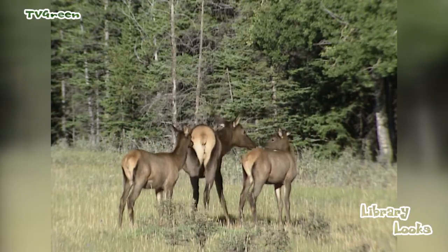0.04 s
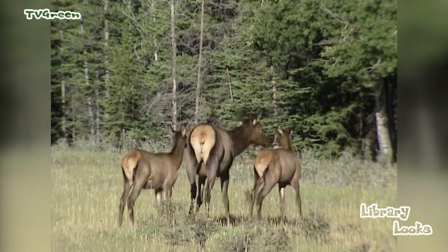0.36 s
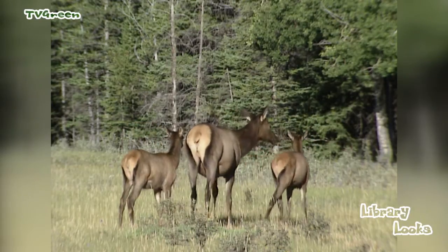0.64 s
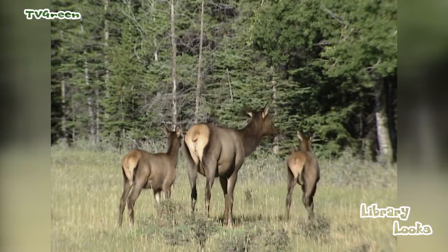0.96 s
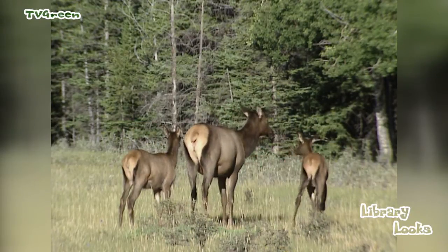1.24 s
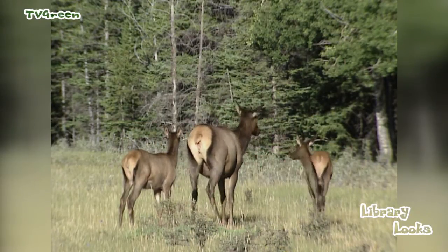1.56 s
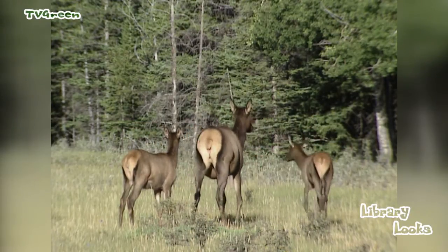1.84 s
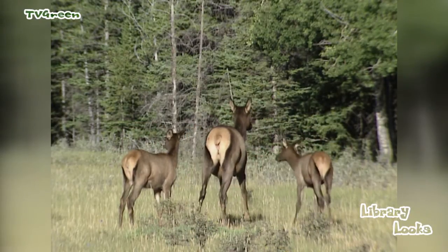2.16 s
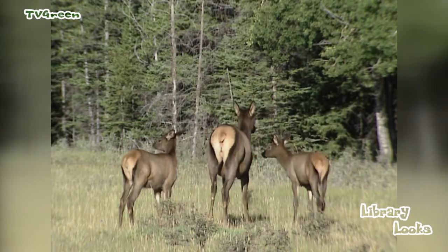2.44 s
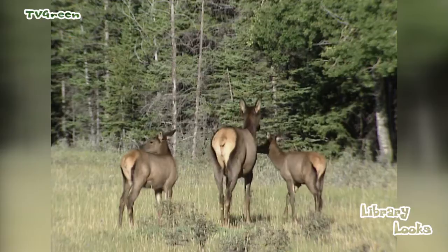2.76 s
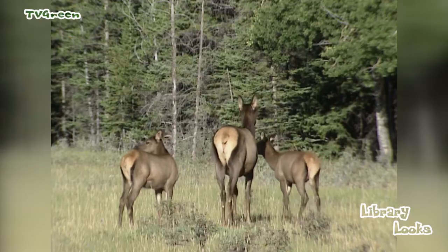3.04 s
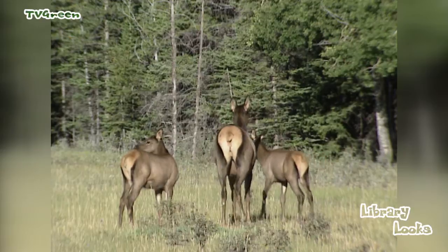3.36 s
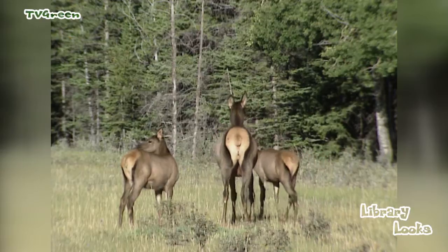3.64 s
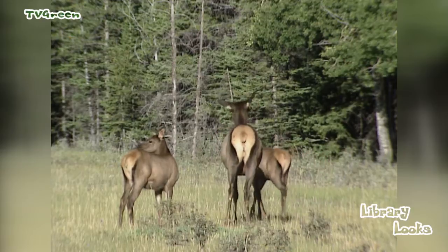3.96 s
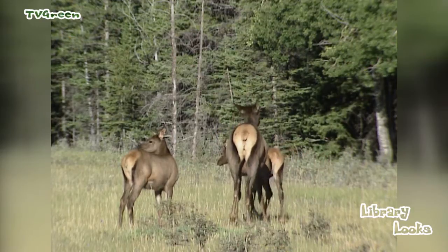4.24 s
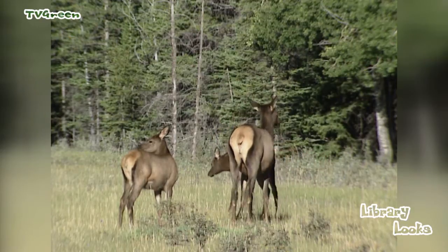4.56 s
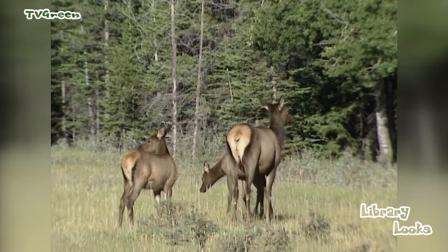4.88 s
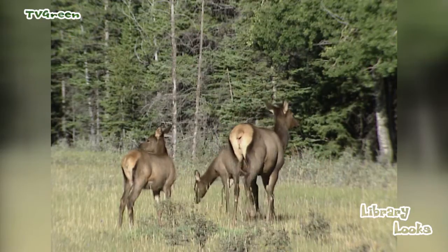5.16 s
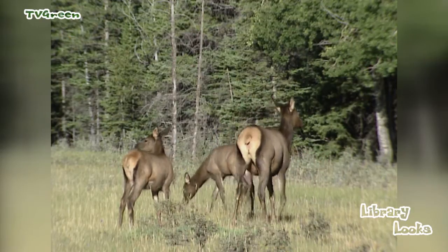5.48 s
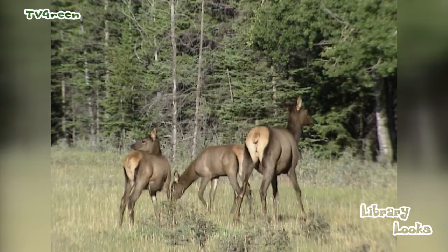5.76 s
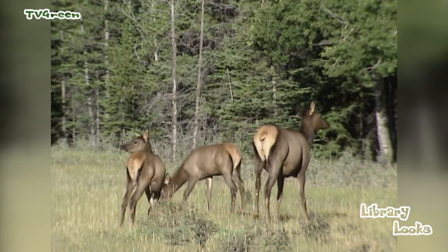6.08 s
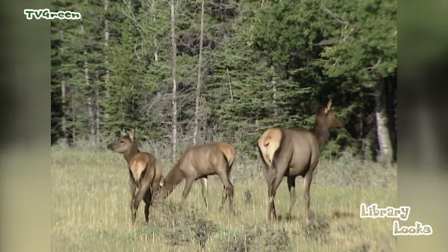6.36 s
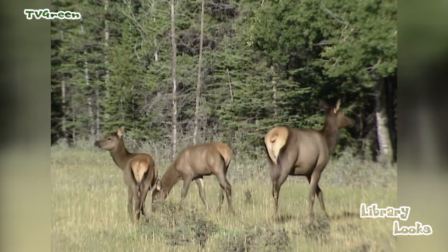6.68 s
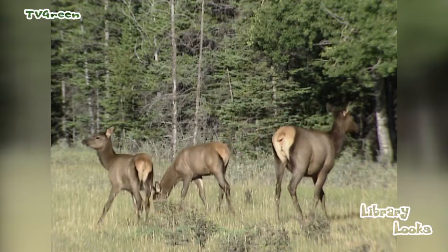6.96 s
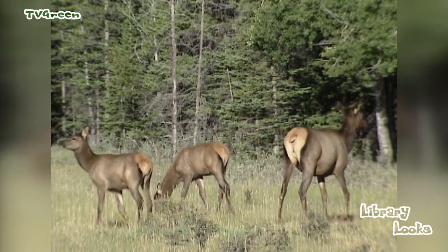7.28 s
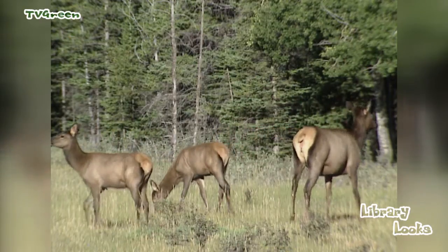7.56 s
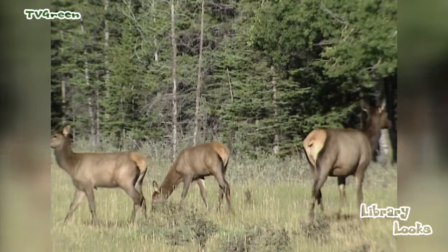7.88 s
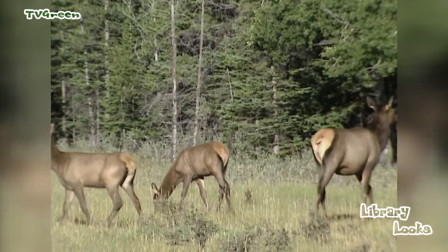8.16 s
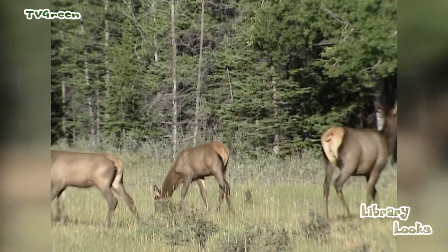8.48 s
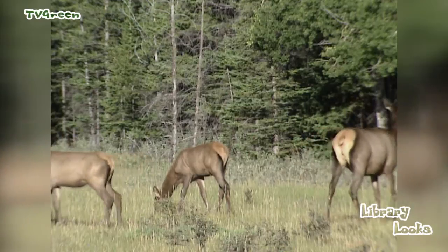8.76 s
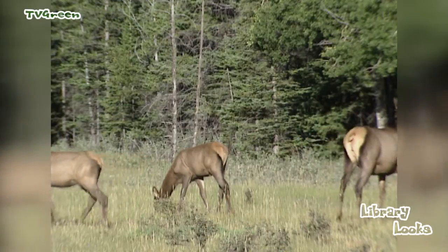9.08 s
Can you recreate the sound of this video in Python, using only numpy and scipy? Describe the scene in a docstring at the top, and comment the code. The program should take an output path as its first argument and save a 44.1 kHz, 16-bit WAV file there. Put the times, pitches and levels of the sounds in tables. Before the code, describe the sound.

A quiet forest clearing opens with the soft murmur of a distant road, faint far-off bird peeps and a few tiny snaps of dry stems. A very thin, high electronic whine sits barely audible throughout. At about 1.7 seconds a small bird gives a short, sharp, rising chirp that echoes briefly among the trees. From about 2 seconds a breeze buffets the microphone with a low, uneven rumble, the loudest sound, peaking near 3.4 seconds. The bird calls again at 3.3 and 4.5 seconds. From about 5 seconds elk brush very softly through the grass, with a few dry ticks. The wind eases after 6 seconds, and the fourth chirp comes at 7.8 seconds. The wind dies away by 8.5 seconds, leaving light grass swishes, ticks and distant peeps over the road murmur until the end, just after 9 seconds.

```python
"""A forest clearing where elk graze. From the start a distant road murmurs, the camera whines thinly,
stems snap and far birds peep. Near 1.7 s a small bird sings the first of four sharp "whit" calls, two
voices at once, which echo among the trunks. A breeze rises and buffets the microphone through the next
two calls (3.3 and 4.5 s). From about 5 s the elk swish through the grass. The breeze eases after 6 s,
the last whit comes at 7.8 s, and the wind dies away under more swishes and dry ticks."""
import sys
import numpy as np
from scipy import signal
from scipy.fft import rfft, irfft
from scipy.io import wavfile
from scipy.ndimage import uniform_filter1d

SR = 44100
rng = np.random.default_rng(int(sys.argv[2]) if len(sys.argv) > 2 else 0)


def unload_audio(sound):
    """Save the sound as a 16-bit wav file, at the path given as the first command line argument."""
    columns = np.transpose(np.atleast_2d(sound))
    # keep every value between -1 and 1, then stretch to whole-number steps
    steps = np.round(np.clip(columns, -1, 1) * 32767)
    wavfile.write(sys.argv[1], SR, steps.astype(np.int16))


N = 406602
TIME = np.arange(N) / SR


def gain(db):
    """Turn decibels into a number to multiply by."""
    return 10 ** (np.asarray(db) / 20)


def unit(x):
    """Scale a signal so its average size (rms) is 1."""
    return x / np.sqrt(np.mean(x ** 2))


def curves(table, at=TIME):
    """Join a table's rows with straight lines: one curve for each column after the first."""
    times, *columns = np.transpose(table)
    return [np.interp(at, times, column) for column in columns]


def add(out, start_s, x):
    """Mix x into out at the given time."""
    i = max(int(start_s * SR), 0)
    out[i:i + len(x)] += x[:max(N - i, 0)]


def noise(spectrum):
    """Noise of size 1, its tone shaped by rows of f/Hz, level/dB."""
    hz, db = np.transpose(spectrum)
    freqs = np.maximum(np.fft.rfftfreq(N, 1 / SR), 1)
    shape = gain(np.interp(np.log(freqs), np.log(hz), db))
    return unit(irfft(rfft(rng.standard_normal(N)) * shape, N))


def band(x, hz, width_hz):
    """Keep the sound near one pitch; filtering twice makes the edges steeper."""
    b, a = signal.iirpeak(min(hz, .45 * SR), hz / width_hz, fs=SR)
    return signal.lfilter(b, a, signal.lfilter(b, a, x))


def wander(per_s):
    """A smooth random curve of size 1 that changes about per_s times a second."""
    return noise([(per_s / 2, 0), (per_s, -3), (2 * per_s, -30), (4 * per_s, -120)])


def jitter(count, smooth):
    """A quick random tremble of size 1, averaged over `smooth` samples."""
    return unit(uniform_filter1d(rng.standard_normal(count), size=smooth))


def steady(x, span_s):
    """Even out the slow swells of a noise."""
    return x / np.sqrt(uniform_filter1d(x ** 2, int(span_s * SR)) + 1e-9)


def forest(x, echo_db, wood_fade_s=.8, ring_fade_s=1.1, trunks_fade_s=.3):
    """Near trunks throw back clear echoes; the deeper wood adds a grainy tail that fades to a ring."""
    t = np.arange(SR) / SR

    def echoes(per_s, fade_s):
        """Randomly timed echoes that drop by 60 dB in fade_s."""
        taps = rng.standard_normal(SR) * (rng.random(SR) < per_s / SR)
        return unit(taps * gain(-60 * t / fade_s) * (t > .003)) / np.sqrt(SR)

    treble = signal.butter(2, [2900, 6500], "band", fs=SR, output="sos")
    wood = signal.sosfilt(treble, echoes(1300, wood_fade_s))
    ring = band(echoes(400, ring_fade_s), hz=3630, width_hz=680)
    trunks = echoes(300, trunks_fade_s)
    response = gain(echo_db) * (wood + gain(-1) * ring) + gain(-11) * trunks
    return x + signal.fftconvolve(x, response)[:N]


# The whine of the camera's electronics: f/Hz, level/dB
CAMERA_WHINE = [(15622, -81)]
def camera():
    """The electronics whine and the motor adds two faint notes, all slightly unsteady."""
    motor_notes = [(1163, -83.5), (6037, -99)]  # f/Hz, level/dB
    out = np.zeros(N)
    for hz, db in list(CAMERA_WHINE) + motor_notes:
        phase = 2 * np.pi * np.cumsum(hz + 4 * wander(17.4)) / SR
        out += np.sqrt(2) * gain(db) * np.sin(phase)
    return out


# The tone of the far road and treetops: f/Hz, relative level/dB
RUSH_TONE = [(25, -8.5), (100, 5.5), (150, 4.5), (200, -0.5), (300, -0.5), (500, 0), (900, -0.5),
             (1200, -4), (1600, -12), (2300, -17.5), (3100, -21), (4200, -26.5), (7000, -29), (10000, -32),
             (15500, -33)]
# Far motors: t/s, low drone level/dB, higher hum level/dB
FAR_MOTORS = [(0, -60, -85), (1.2, -60.5, -69.5), (2.5, -56.5, -68), (3.4, -70, -72.5), (6.5, -75, -81),
              (9.2, -65, -113)]
def road_and_treetops(rush_db=-59, swell_db=.2):
    """An even rush from the road and the treetops, with motors droning in it."""
    drone_db, hum_db = curves(FAR_MOTORS)
    out = noise(RUSH_TONE) * gain(rush_db + swell_db * wander(4))
    for hz, db in (97, drone_db), (410, hum_db):
        phase = 2 * np.pi * np.cumsum(hz + 3 * wander(8)) / SR
        out += gain(db) * np.sin(phase)
    return out


# The breeze at the microphone rises, blows for four seconds and dies away: t/s, level/dB
BREEZE_LEVEL = [(0, -66.5), (1.35, -62), (1.6, -50.5), (2.1, -52), (2.35, -43.5), (2.75, -39.5), (3.4, -36),
                (4.1, -40.5), (4.5, -43), (5.4, -43), (5.6, -49.5), (5.8, -43), (6.2, -44), (6.45, -52),
                (8.1, -53.5), (8.55, -66), (9.22, -62)]
# Sudden gusts: peak t/s, length/s, level above the breeze/dB
SUDDEN_GUSTS = [(2.222, 0.12, 10.5), (2.987, 0.053, 4), (3.352, 0.044, 4), (4.252, .11, 6),
                (4.954, 0.14, 2.5), (5.768, 0.23, 6)]
# The deep tone of big swirls of air: f/Hz, relative level/dB
BIG_SWIRLS = [(10, -39), (25, -7), (38, 9.5), (58, 0), (85, -5.5), (120, -21), (200, -47.5), (900, -110)]
# The higher tone of small swirls: f/Hz, relative level/dB
SMALL_SWIRLS = [(30, -38), (65, -2), (110, 0.5), (160, -6), (220, -12.5), (320, -20.5), (600, -40),
                (3000, -100)]
def wind(flutter_db=2, fresh_breeze_db=-40, small_in_fresh_db=-50.5, small_growth=1.48):
    """Big swirls of air thump the microphone, gusts shed small ones, and rough air shakes both."""
    breeze_db, = curves(BREEZE_LEVEL)
    breeze_db += sum(db * np.exp(-(2 * (TIME - peak) / length) ** 2) for peak, length, db in SUDDEN_GUSTS)
    shake_db = flutter_db * wander(6)
    thumps = steady(noise(BIG_SWIRLS), span_s=.09) * gain(breeze_db + shake_db)
    # as the breeze picks up, the small swirls grow faster than the big ones
    small_db = small_in_fresh_db + small_growth * (breeze_db - fresh_breeze_db)
    return thumps + steady(noise(SMALL_SWIRLS), span_s=.12) * gain(small_db + shake_db)


# Short dry ticks, from snapping stems and a few clipped bird chips: t/s, middle f/Hz, width/Hz, level/dB
DRY_TICKS = [(.362, 4800, 3500, -69), (.665, 4500, 2500, -67), (.79, 9200, 1200, -73),
             (.818, 9400, 2000, -68), (0.915, 3100, 500, -56), (.916, 6400, 1200, -64),
             (1.068, 5140, 2000, -66), (2.964, 5100, 1500, -66), (3.13, 9300, 3000, -72),
             (3.22, 5100, 1500, -66), (4.765, 5000, 2500, -67), (5.19, 8000, 5000, -71),
             (5.225, 7000, 2000, -69), (5.257, 5060, 1200, -64), (5.32, 9500, 3500, -60.5),
             (8.64, 5500, 3000, -62), (9.115, 13500, 1000, -65)]
# Legs and muzzles brushing through grass: t/s, length/s, middle f/Hz, level/dB
GRASS_SWISHES = [(5.25, 0.17, 6300, -78.5), (5.394, 0.24, 8000, -81), (5.804, .21, 7860, -79.5),
                 (6.262, 0.29, 7700, -80.5), (6.61, .08, 8000, -82), (6.882, 0.15, 7200, -82),
                 (7.398, .16, 7000, -82), (7.945, .18, 7500, -81.5), (8.17, .22, 8000, -82.5),
                 (8.475, 0.3, 5860, -74), (8.658, 0.32, 6860, -78.5), (8.911, 0.39, 7400, -82.5)]
def ticks_and_swishes(tick_s=.0026, grain_db=7):
    """A tick is a brief burst of noise; a swish is a crowd of tiny clicks as blade rubs on blade."""
    out = np.zeros(N)
    t = np.arange(SR // 20) / SR
    for start, hz, width, db in DRY_TICKS:
        tick = band(rng.standard_normal(len(t)) * np.exp(-t / tick_s), hz, width)
        tick *= np.sqrt(tick_s * SR / 2 / np.sum(tick ** 2))  # same energy whatever the width
        add(out, start, gain(db) * tick)
    for start, length, hz, db in GRASS_SWISHES:
        count = int(length * SR)
        clicks = rng.standard_normal(count) * gain(grain_db * np.minimum(rng.exponential(size=count), 4))
        swell = np.sin(np.linspace(0, np.pi, count))
        add(out, start, gain(db) * unit(band(clicks, hz, .87 * hz)) * swell)
    return out


def voice_phase(hz, waver):
    """The phase (place in the wave) of one voice from a bird's voice box, its pitch a little shaky."""
    return 2 * np.pi * np.cumsum(hz * (1 + waver * jitter(len(hz), smooth=40))) / SR


# Thin, slightly arched "seet" notes of a second bird: t/s, top f/Hz, level/dB
SEET_NOTES = [(.963, 5720, -77), (1.292, 6020, -71), (3.16, 6350, -78), (4.33, 6000, -77),
              (5.683, 5870, -76), (6.898, 6300, -73.5), (7.158, 6300, -77), (7.69, 5930, -70),
              (8.885, 6130, -77)]
# Soft, lower chips from deeper in the wood: t/s, top f/Hz, level/dB
CHIP_NOTES = [(.135, 2800, -76), (1.011, 2870, -72), (4.365, 3200, -67.5), (6.338, 2695, -72),
              (7.21, 3100, -73), (7.732, 2900, -68.5), (8.927, 3330, -64)]
def peeps(notes, length_s, arch, rasp_db=3, octave_db=-9.5):
    """Each peep is a slightly hoarse whistle whose pitch arches and peaks late; distance dulls it."""
    out = np.zeros(N)
    progress = np.linspace(0, 1, int(length_s * SR))
    for start, top_hz, db in notes:
        level = gain(db + rasp_db * jitter(len(progress), smooth=60))
        hz = top_hz * (1 - arch * (progress - .65) ** 2)
        phase = voice_phase(hz, waver=.093 * arch)
        whistle = np.sin(phase) + gain(octave_db) * np.sin(2 * phase)
        add(out, start, level * whistle * np.sin(np.pi * progress))
    return signal.sosfilt(signal.butter(6, 8200, fs=SR, output="sos"), out)


# The low voice's arch: time/share of call length, pitch/share of top pitch, relative level/dB
LOW_SHAPE = [(-.04, .63, -22), (.04, .69, -2), (.18, .82, -.5), (.38, .94, 1), (.6, 1, 0), (.8, .975, -2.5),
             (1, .7, -4), (1.1, .62, -20)]
# The high voice's sweep: time/share of call length, pitch/share of top pitch, relative level/dB
HIGH_SHAPE = [(-.42, .4, -24), (-.26, .46, -9), (-.12, .55, -6), (.02, .7, 1), (.16, .82, 4),
              (.36, .93, -3), (.62, 1, -7), (.88, .985, -10), (1.05, .92, -25)]
# The four calls: t/s, length/s, low voice's top f/Hz, its level/dB, high voice's top f/Hz, its level/dB,
# low voice's swell over the call/dB, relative level of the low voice's octave/dB
WHIT_CALLS = [(1.698, 0.055, 3620, -52.5, 5860, -66, -6, -29),
              (3.328, 0.039, 3780, -54, 5680, -57, -6, -20), (4.519, .049, 3700, -58, 5540, -57.5, 1, -16),
              (7.826, 0.042, 3600, -51.5, 5560, -58, -15.5, -28)]
def whits(rasp_db=2.5, blend_db=-19, rattle_db=-15, high_octave_db=-20):
    """Each side of the bird's voice box sings: the high voice sweeps up, then the low arches under it."""
    out = np.zeros(N)
    rattle_band = signal.butter(4, [2800, 6800], "band", fs=SR, output="sos")

    def voice(shape, top_hz, db, progress):
        """The raspy loudness and the phase of one side's voice."""
        pitch, shape_db = curves(shape, progress)
        level = gain(db + shape_db + rasp_db * jitter(len(progress), smooth=70))
        level *= progress > shape[0][0]  # silent until this voice comes in
        return uniform_filter1d(level, size=20), voice_phase(top_hz * pitch, waver=.0054)

    for start, length, low_hz, low_db, high_hz, high_db, swell_db, low_octave_db in WHIT_CALLS:
        progress = np.arange(HIGH_SHAPE[0][0], LOW_SHAPE[-1][0], 1 / (length * SR))
        low, low_phase = voice(LOW_SHAPE, low_hz, low_db + swell_db * (progress - .3), progress)
        high, high_phase = voice(HIGH_SHAPE, high_hz, high_db, progress)
        call = low * (np.sin(low_phase) + gain(low_octave_db) * np.sin(2 * low_phase))
        call += high * np.sin(high_phase)
        # together the voices make a faint tone at the sum of their pitches
        blend = np.sqrt(low * high) * np.sin(low_phase + high_phase)
        call += gain(blend_db) * band(blend, hz=5800, width_hz=4300)
        # the thin skins of the voice box rattle as the second voice starts
        rattle = unit(signal.sosfilt(rattle_band, rng.standard_normal(len(progress))))
        call += gain(high_db + rattle_db) * rattle * np.exp(-(progress / .42) ** 2)
        # the beak opens widest at the top of the arch and lets the high voice's octave out
        beak = np.exp(-((progress - .55) / .43) ** 2)
        call += gain(high_db + high_octave_db) * beak * np.sin(2 * high_phase)
        add(out, start + progress[0] * length, call)
    return out


def scene():
    """Birds and grazing elk echo in the forest, over wind, far traffic and the camera."""
    birds = forest(whits(), echo_db=-5)
    birds += forest(peeps(SEET_NOTES, length_s=.028, arch=.15), echo_db=-10)
    birds += forest(peeps(CHIP_NOTES, length_s=.038, arch=.65), echo_db=-8)
    rustle = forest(ticks_and_swishes(), echo_db=-8.5)
    return (birds + rustle + wind() + road_and_treetops() + camera())[None]


def record(dry):
    """The recorder cuts off the highest treble, above 15760 Hz."""
    return signal.sosfilt(signal.ellip(12, .1, 70, 15760, fs=SR, output="sos"), dry)


dry = scene()
out = record(dry)
unload_audio(out)
```